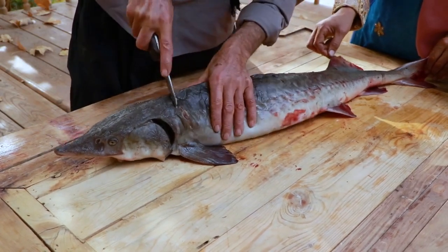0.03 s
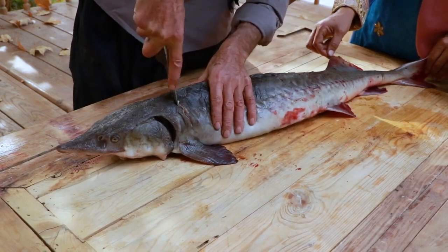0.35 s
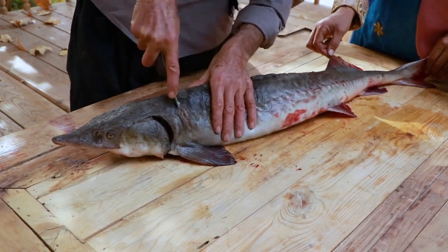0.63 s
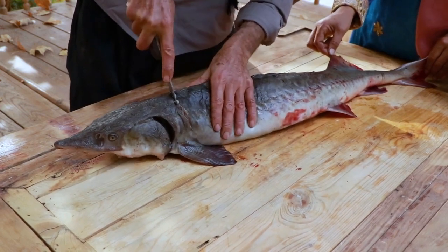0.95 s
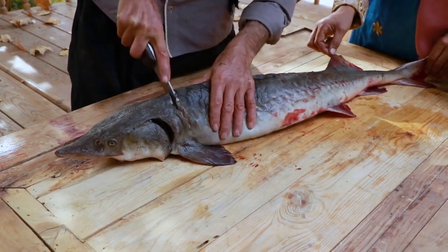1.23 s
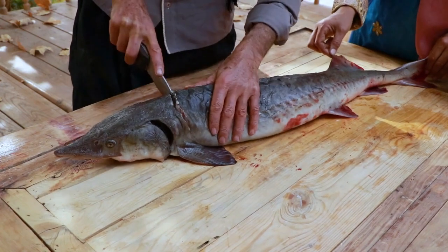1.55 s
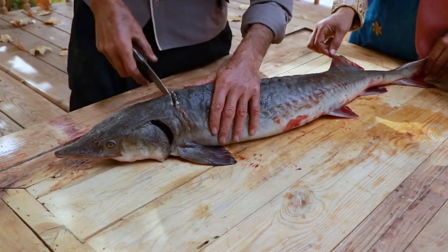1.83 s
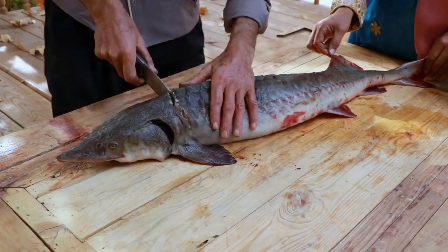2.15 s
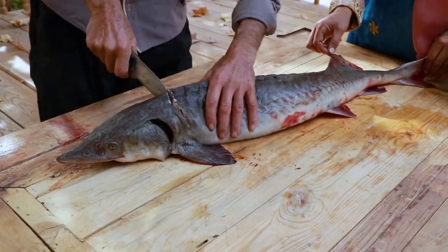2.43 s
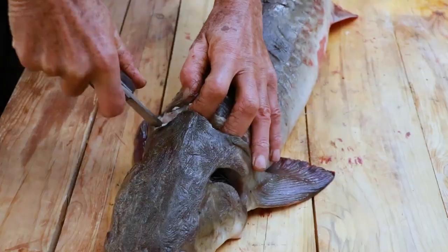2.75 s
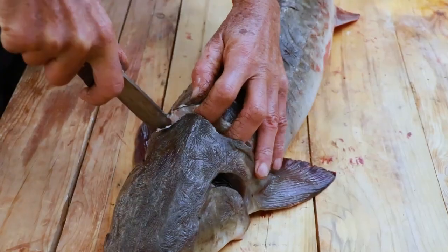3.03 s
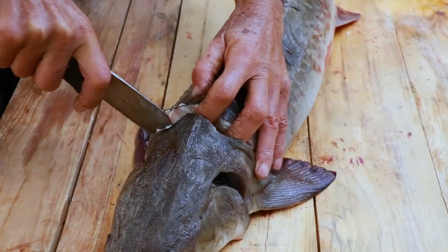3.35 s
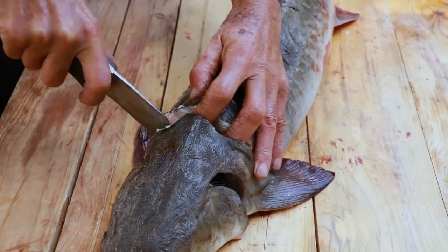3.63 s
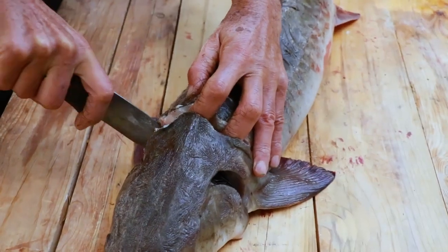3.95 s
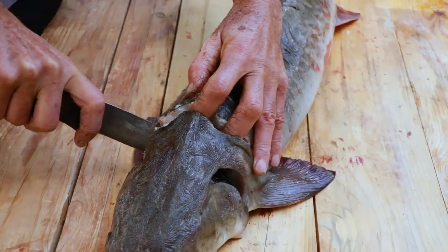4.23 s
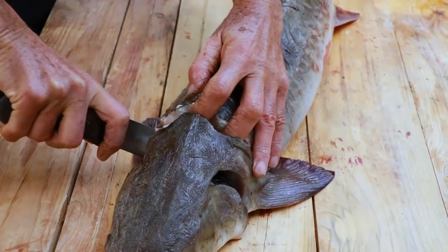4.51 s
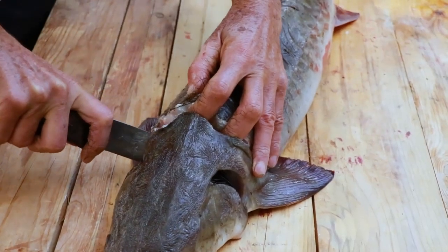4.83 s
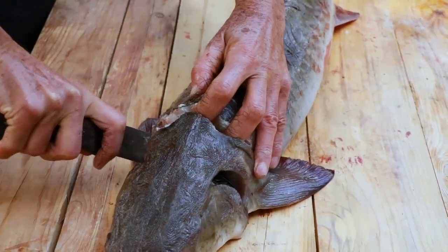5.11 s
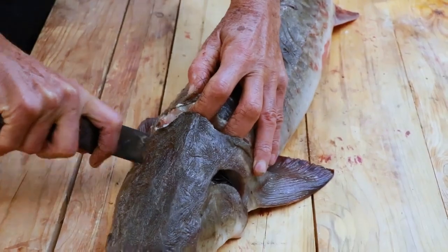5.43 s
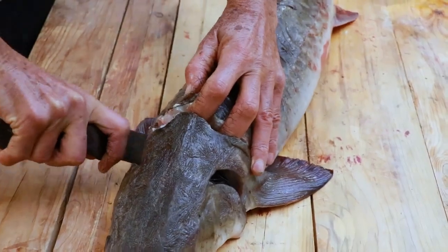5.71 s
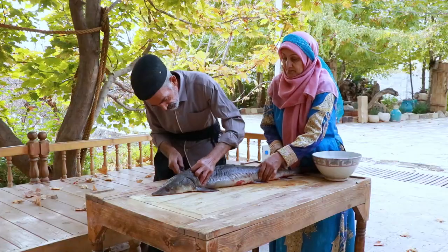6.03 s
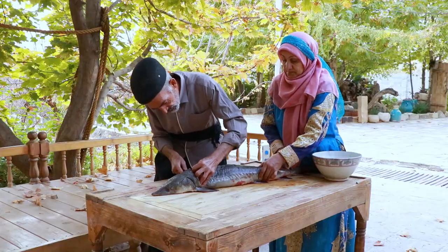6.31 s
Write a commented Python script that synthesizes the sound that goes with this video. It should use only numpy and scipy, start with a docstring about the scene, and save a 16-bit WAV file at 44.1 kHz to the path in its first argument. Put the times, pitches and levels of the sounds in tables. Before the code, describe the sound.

A knife saws into a large fish on a wooden table in an outdoor yard. Close by, the blade clicks on bony plates and rasps through wet skin in short, uneven strokes, with soft thuds on the boards and a few dull clacks. Midway the bone crunches loudest, while a small bird on the left sings chips and buzzy trills. Another bird whistles on the right, over distant twittering and a soft hush of leaves.

```python
"""A yard, where a knife saws into a large fish on a wooden table. The blade ticks on bony plates, rubs
the flesh and rasps through wet skin; the body shifts and thuds on the boards. Dull clacks echo round
the yard. A small bird to the left sings chips and buzzy trills, another whistles to the right.
Behind them are far birds, a soft hush of air and leaves and, near the end, a faint hum."""
import sys
import numpy as np
from scipy import signal
from scipy.fft import rfft, irfft, next_fast_len
from scipy.io import wavfile
from scipy.ndimage import uniform_filter1d, map_coordinates

SR = 44100
rng = np.random.default_rng(int(sys.argv[2]) if len(sys.argv) > 2 else 0)


def generate_wav(signal):
    """Clip the signal to [-1, 1] and save it as 16-bit WAV at the path in sys.argv[1]."""
    frames = np.transpose(np.atleast_2d(signal))
    scaled = np.clip(frames, -1, 1) * 32767
    pcm = np.round(scaled).astype(np.int16)
    wavfile.write(sys.argv[1], SR, pcm)


N = 289737

# The blade catches on bone. Each row: start in seconds, level in dB, knock trim in dB,
# edge trim in dB, left over right in dB.
BONE_CATCHES = [(0.594, -54, -4, 4, -4), (0.619, -20.5, -28, -11, 4), (0.661, -37, -25, -4, -1),
                (0.791, -30, -19.5, -11, 1), (1.12, -31, -26, -9.5, -1), (1.125, -35.5, -21, -11, 3),
                (1.144, -35, -21, -20, 0), (1.156, -33.5, -22, -25, 0), (1.1745, -32, -41, -25, 0),
                (1.1836, -26.5, -45, -12, 1), (1.433, -30, -16.5, -18, 4), (1.445, -36, -28, 0, -7),
                (1.468, -30.5, -29, 0, 2), (1.541, -45, -24, 0.5, -1), (1.648, -51, -25, 4, -4),
                (2.445, -46.5, -46, 2, 0), (2.641, -45.5, 0, -23, -13), (2.680, -25, -7, -4.5, -3),
                (2.696, -12, -15, -11.5, -1), (2.705, -28, -8, -16, 2), (2.714, -20.5, -9.5, -12, 1),
                (2.7234, -19, -16.5, -7, -1.5), (2.741, -35.5, -0.5, -22, -1),
                (2.767, -39.5, -4.5, -25, -3), (2.8068, -33.5, -14.5, -5, 2), (2.816, -44, -11, -2, -2),
                (2.838, -40, -9, -30, -9), (2.869, -36.5, -12, -28, -3), (2.881, -39, -20, -31, 3),
                (2.917, -48, -1, -30, 1), (2.948, -35, -11, -32, 2), (3.0114, -47, -39, -14, 5),
                (3.753, -38, -16, -27, 2), (3.7929, -19, -45, -20, 0), (3.821, -36, -10, -30, 1),
                (4.62, -31.5, -8.5, -16, 7), (4.763, -44.5, -18, -17, 3), (5.011, -38, -30, -16, 1),
                (5.7005, -33.5, -2, -21, 0), (5.7501, -32.5, -8, -7.5, -2), (5.755, -39, -18, -12, 0),
                (6.0568, -38, -12, -32, 4), (6.149, -41, -10, -11, 0), (6.4274, -44, -18, -5, 3)]
# Tone of the cracking bone and of the bright knife edge. Each row: frequency in Hz, level in dB.
BONE_EQ = [(300, -7), (1500, -12.5), (2500, 3.5), (4000, 4), (6000, 7.5), (8000, -10), (12000, -23)]
EDGE_EQ = [(5000, -38), (8000, -2.5), (11500, 8.5), (14000, -3), (16000, -15)]
# Resonances of the fish's head. Each row: frequency in Hz, bandwidth in Hz, level in dB.
SKULL_MODES = [(1020, 62, 29), (2240, 250, -28)]

def bone_ticks(snap_s=0.00084, crumble_s=0.0092, crumble_db=-15):
    """The edge snaps over a bony plate: a crack, a short crumble and a knock in the head."""
    out, t = np.zeros((2, N)), np.arange(SR // 12) / SR
    envelope = np.exp(-t / snap_s) + amp(crumble_db) * np.exp(-t / crumble_s)
    for start, db, knock_db, edge_db, left_db in BONE_CATCHES:
        crack = amp(-12) * crest(coloured(stereo_noise(len(t), 0.4) * envelope, BONE_EQ))
        edge = amp(edge_db - 11) * crest(coloured(stereo_noise(len(t), 0.13) * envelope, EDGE_EQ))
        ring = sum(amp(level) * np.exp(-np.pi * width * t)
                   * np.sin(2 * np.pi * hz * rng.normal(1, 0.099) * t)
                   for hz, width, level in SKULL_MODES)
        knock = amp(knock_db - 4) * crest((ring * np.exp(-t / 0.007))[None])
        add(out, start, amp(db) * pan(left_db) * (crack + pan(-4) * edge + knock))
    return out


# Strokes of the knife. Each row: start in seconds, length in seconds, then levels in dB for
# pressure on the table, rub, wet rasp and blade hiss.
KNIFE_STROKES = [(0.002, 0.095, -53, -73, -71, -83), (0.111, 0.024, -49, -54.5, -67, -78),
                 (0.386, 0.31, -50, -66, -64.5, -69), (0.658, 0.038, -62, -66, -53, -66),
                 (0.791, 0.01, -49, -63, -51, -62), (1.074, 0.087, -48, -72, -54, -62),
                 (1.397, 0.068, -47, -52, -60.5, -62), (2.418, 0.074, -55, -56.5, -64, -66),
                 (2.533, 0.043, -67, -78, -76, -78), (2.609, 0.072, -49, -46, -62, -76),
                 (2.675, 0.11, -36.5, -45, -63, -72), (2.792, 0.028, -50, -53, -52, -61),
                 (2.853, 0.1, -49, -52.5, -82, -85), (3.466, 0.056, -65, -52, -54.5, -76),
                 (3.738, 0.055, -46, -41.5, -49.5, -62), (4.016, 0.062, -48, -52.5, -78, -85),
                 (4.491, 0.16, -45, -49, -60.5, -76), (4.982, 0.086, -46, -47, -60.5, -77),
                 (5.311, 0.068, -59, -48.5, -65, -67), (5.611, 0.055, -41.5, -45, -63, -82),
                 (5.672, 0.02, -36.5, -35.5, -55, -78), (5.741, 0.01, -52, -49.5, -59, -78),
                 (6.149, 0.098, -74, -54, -60, -60), (6.262, 0.77, -66, -69, -61, -75)]

def stroke_envelopes(bite_s=0.0097, build_db=6.5, release_s=0.019, linger_db=-12.5, linger_s=0.11):
    """Each stroke bites, builds as the blade digs in and lets go; the wet skin crackles on softly."""
    power, t = np.zeros((4, N)), np.arange(SR) / SR
    for start, length, *levels_db in KNIFE_STROKES:
        build = np.minimum(t / bite_s, 1) * amp(build_db * (np.minimum(t / length, 1) - 1))
        after = np.maximum(t - length, 0)
        release = np.hypot(np.exp(-after / release_s), amp(linger_db) * np.exp(-after / linger_s))
        add(power, start, (amp(levels_db)[:, None] * build * release) ** 2)
    return np.sqrt(power)


# Tone of the boards, rubbed flesh, wet rasp and sliding blade. Each row: frequency in Hz, level in dB.
BOARDS_EQ = [(18, -73), (30, -18.5), (102, -1), (234, -8.5), (264, -11), (317, -6), (436, -17), (510, -23),
             (552, -18), (700, -24.5), (910, -77), (1540, -120)]
FLESH_EQ = [(250, -35), (450, -3), (950, 4), (1500, -0.5), (2200, -4), (4000, -8), (7000, -31)]
RASP_EQ = [(1000, -11), (2500, -2), (5500, 8), (8000, -9), (11500, -4.5), (14000, -14), (16000, -38)]
SLIDE_EQ = [(5000, -25), (8000, -10), (10500, 3), (13000, -8), (15500, -4)]

def sawing(judder_db=2):
    """The knife rocks the table, rubs the flesh, tears wet skin in tiny grains and hisses as it slides."""
    press, drag, tear, slide = stroke_envelopes() * amp(judder_db * wobble(45))
    boards = amp(-6.5) * unit(rush(BOARDS_EQ, grain_db=-0.5, patchy_db=3.5).mean(0))
    rub = amp(-6) * rush(FLESH_EQ, grain_db=3.5, patchy_db=4.5)
    rub += amp(-19.5) * scale_snaps(per_s=500, spread_db=9)
    rasp = amp(1.5) * rush(RASP_EQ, grain_db=1.5, patchy_db=3.5)
    rasp += amp(-8) * scale_snaps(per_s=70, spread_db=4)
    hiss = amp(-1.5) * rush(SLIDE_EQ, grain_db=2.5, patchy_db=3)
    return press * boards + drag * rub + tear * rasp * pan(-0.49) + slide * hiss


def scale_snaps(per_s, spread_db):
    """Tiny scales snap under the edge at random."""
    snaps = (rng.random(N) < per_s / SR) * amp(spread_db * np.clip(rng.standard_normal(N), -2, 2))
    return unit(coloured(snaps * stereo_noise(N, 0.43), BONE_EQ))


# Wet pockets pop. Each row: start in seconds, level in dB, pitch in Hz.
WET_POCKETS = [(0.7909, -40.5, 2130), (2.741, -33.5, 2180), (2.746, -49, 2370)]

def wet_pops(life_s=0.00096):
    """Small cavities in the flesh open and ring for a few cycles."""
    out, t = np.zeros(N), np.arange(SR // 40) / SR
    envelope = t / life_s * np.exp(1 - t / life_s)
    for start, db, hz in WET_POCKETS:
        add(out, start, amp(db) * envelope * np.sin(2 * np.pi * hz * t))
    return out


# The fish bumps the boards. Each row: start in seconds, level in dB, pitch in Hz, shudder trim in dB.
BODY_BUMPS = [(0.151, -42.5, 363, -5), (0.207, -49, 145, -6), (0.382, -41.5, 90, -5.5),
              (0.481, -45, 107, -20), (0.542, -39, 102, -4.5), (0.573, -43.5, 106, 5),
              (1.088, -38.5, 149, -5), (1.15, -41, 100, -21), (1.18, -41, 124, -7), (1.377, -41, 95, -5),
              (1.391, -37, 316, -4), (2.149, -39, 116, -9.5), (2.464, -28, 317, -27),
              (2.616, -30.5, 415, -12), (2.685, -30, 287, -7), (2.698, -27, 300, -17),
              (2.919, -41, 344, -5.5), (3.761, -41, 86, -6), (3.921, -36.5, 124, -6),
              (4.015, -29.5, 200, -4.5), (4.025, -28, 380, -10), (4.048, -37, 200, -17),
              (4.061, -55, 190, -18), (4.546, -44.5, 126, -18), (5.614, -41.5, 115, -8),
              (5.821, -33.5, 125, -10), (5.833, -30.5, 235, -24), (5.845, -38.5, 284, -22)]

def body_thuds(rise_cycles=0.95, shudder_t60_s=0.26, low_cut_hz=45):
    """The body gives a soft push of a few cycles, and the boards shudder."""
    out, t = np.zeros((2, N)), np.arange(SR // 3) / SR
    for start, db, hz, shudder_db in BODY_BUMPS:
        age = t * hz / rise_cycles
        push = age * np.exp(1 - age) * np.sin(2 * np.pi * hz * t)
        shudder = crest(coloured(stereo_noise(len(t), 0.97) * amp(-60 * t / shudder_t60_s), BOARDS_EQ))
        add(out, start, amp(db) * (amp(-4.5) * push + amp(shudder_db - 3) * shudder))
    return signal.sosfilt(signal.butter(2, low_cut_hz, "highpass", fs=SR, output="sos"), out)


# Clacks in the yard. Each row: start in seconds, level in dB, left over right in dB, snap trim in dB.
CLACK_HITS = [(0.282, -36, -2, -8), (0.672, -37, 0.5, -3), (1.751, -38.5, 0, -4), (2.24, -39, -0.5, -8),
              (4.021, -53.5, 15, -30), (4.607, -33, -1.5, -0.5), (4.974, -39.5, 0.5, -16),
              (5.049, -45, 3, -16)]
# Their woody tone. Each row: frequency in Hz, level in dB.
CLACK_EQ = [(210, -53), (350, -35), (537, 1), (824, 0.5), (1280, -0.5), (2000, -3), (2310, -5.5),
            (2750, -5.5), (2980, -7), (3280, -4), (5530, -7.5), (8220, -23.5), (11500, -19.5), (15500, -30)]

def wooden_clacks(rise_s=0.00021, decay_s=0.016, snap_s=0.0084):
    """Dull wooden clacks: a fast-dying burst of noise with a brief snap on top."""
    out, t = np.zeros((2, N)), np.arange(SR // 6) / SR
    envelope = (1 - np.exp(-t / rise_s)) * np.exp(-t / decay_s)
    for start, db, left_db, snap_db in CLACK_HITS:
        body = crest(coloured(stereo_noise(len(t), 0.33) * envelope, CLACK_EQ))
        snap = crest(coloured(stereo_noise(len(t), 0.26) * np.exp(-t / snap_s), RASP_EQ))
        add(out, start, amp(db - 2.5) * pan(left_db) * (body + amp(snap_db) * snap))
    return out


# The near bird's chips; those sung facing away arrive mostly as echo. Each row: start and length in
# seconds, first, middle and last pitch in Hz, level in dB, direct-path trim in dB.
NEAR_CHIPS = [(1.951, 0.018, 3730, 3470, 3340, -39, 1.5), (2.003, 0.0122, 6220, 6150, 5600, -33.5, 3.5),
              (2.237, 0.0195, 3620, 3560, 3270, -35, 5.5), (2.29, 0.0134, 6200, 5990, 5300, -29, 0.5),
              (2.449, 0.0304, 6450, 6680, 7060, -28, -1), (3.247, 0.011, 4770, 4770, 4870, -36, 4.5),
              (3.252, 0.033, 2770, 3070, 3200, -52, 6), (3.279, 0.018, 3350, 3405, 3560, -30, 4.5),
              (3.55, 0.026, 7040, 7320, 7270, -37.5, -9), (3.586, 0.017, 6960, 6320, 5100, -34.5, -4),
              (3.955, 0.0127, 5630, 6340, 6670, -42, -5), (3.978, 0.06, 4740, 4660, 4610, -40, -5),
              (4.024, 0.0278, 2430, 2675, 2900, -34.5, -3.5), (4.08, 0.0182, 5460, 6380, 6770, -47, -3),
              (4.103, 0.0448, 4470, 4656, 4670, -41, -3.5), (4.148, 0.0175, 2413, 2563, 2780, -35, 0)]
# Its trills. Each row: start, attack and length in seconds, first and last pitch in Hz, level and fade
# in dB, beats per second, sweep in Hz, pulsing in dB, opening hoarseness in Hz, rasp in Hz.
NEAR_TRILLS = [(2.518, 0.025, 0.65, 5280, 5516, -33, -0.6, 114.5, 266, 7.5, 145.3, 83.7),
               (3.277, 0.013, 0.2, 3488, 3944, -27.5, 9.5, 280, 337, -3, 25, 69),
               (3.6396, 0.046, 0.255, 3330, 3685, -27, 10, 71.5, 225, 6.5, 35.4, 61)]
# Tone of its two low trills, and of its whole song on the right. Each row: frequency in Hz, level in dB.
THROAT_EQ = [(2400, -17), (2850, -2), (3150, -4), (3450, 6), (3800, 1), (4100, 4.5), (4400, 4), (4750, -15)]
RIGHT_SIDE_EQ = [(3600, -2.5), (5300, 3), (6500, 3.5)]

def near_bird(lag_radians=2.53):
    """A small bird sings hard left; its song reaches the right side weak and out of phase."""
    high, rising, slow = [trill(*row) for row in NEAR_TRILLS]
    low = coloured((rising + slow)[None], THROAT_EQ)[0]
    # A faint second tone runs under the high trill; their sum frequency is a sheen far above it.
    high_envelope = np.sqrt(np.abs(uniform_filter1d(high ** 2, size=400)))
    undertone = high_envelope * tone(4000 + 60 * wobble(200))
    sheen = filtered(high * unit(undertone), lambda hz: hz > 7000)
    buzz = high + low + amp(-27.5) * undertone + amp(-39.5) * sheen
    song = buzz + chirps([row[:-1] for row in NEAR_CHIPS])
    aimed = buzz + chirps([(*note, db + direct_db) for *note, db, direct_db in NEAR_CHIPS])
    lagged = filtered(aimed, lambda hz: np.exp(-1j * lag_radians))
    direct = amp(-2.3) * np.array([aimed, amp(-16.5) * lagged])
    left, right = direct + amp([[-12], [-19]]) * scatter(song) + amp([[-9], [-17.5]]) * yard_reverb(song)
    return np.array([left, filtered(right, lambda hz: amp(along(RIGHT_SIDE_EQ, hz)))])


def trill(start, attack_s, length, first_hz, last_hz, db, fade_db, rate_hz, sweep_hz, pulse_db,
          hoarse_hz, rasp_hz, release_s=0.0061, hoarsest_s=0.0587, scoop_s=0.0171, scoop_hz=150):
    """A buzz that opens hoarse and low, then climbs, its pitch swinging fast and unevenly."""
    t = np.arange(N) / SR - start
    progress = np.clip(t / length, 0, 1)
    gate = np.clip(t / attack_s, 0, 1) * np.clip(1 - (t - length) / release_s, 0, 1)
    looseness = 0.11 * np.clip(t / 0.2, 0, 1) ** 2  # the beat starts steady, then loosens
    beat = 2 * np.pi * np.cumsum((t > 0) * rate_hz * (1 + looseness * wobble(120))) / SR
    swing = np.cos(beat) + 0.12 * np.cos(2 * beat)  # dwells low, flicks upward
    opening = np.exp(-2 * (t / hoarsest_s - 1) ** 2)
    rasp = rasp_hz * wobble(700) + hoarse_hz * opening * (wobble(1400) - 1.1)
    climb = first_hz + (last_hz - first_hz) * progress ** 0.6
    scoop = np.exp(-np.maximum(t, 0) / scoop_s)
    pitch = climb - scoop_hz * scoop + sweep_hz * (1 - scoop) * swing + rasp
    depth_db = pulse_db * (0.5 - 0.35 * progress)  # positive accents the downward sweeps
    pulses = unit(amp(depth_db * np.sin(beat) + 2.2 * wobble(160)))
    return gate * amp(db - fade_db * progress) * pulses * tone(pitch)


def chirps(notes, swell=0.37, quiver_s=0.0022, waver_hz=12):
    """Short notes glide through three pitches; the faster the glide, the more the pitch quivers."""
    out, waver = np.zeros(N + SR), wobble(450)
    for start, length, first_hz, middle_hz, last_hz, db in notes:
        progress = np.linspace(0, 1, int(length * SR))
        glide = np.polyval(np.polyfit([0, .5, 1], [first_hz, middle_hz, last_hz], 2), progress)
        depth_hz = waver_hz + quiver_s * abs(last_hz - first_hz) / length
        quiver = depth_hz * np.roll(waver, -int(start * SR))[:len(progress)]
        envelope = np.abs(np.sin(np.pi * progress)) ** swell
        add(out, start, amp(db + 2) * envelope * tone(glide + quiver))
    return out[:N]


# The second bird's whistles. Each row: start in seconds, level in dB.
WHISTLE_CUES = [(0.633, -2), (5.242, -2)]
# The shape of one whistle. Each row: time into it in seconds, pitch in Hz, level in dB.
WHISTLE_SHAPE = [(0, 3980, -62), (.009, 4680, -54), (.024, 5090, -55), (.046, 5260, -40), (.066, 5120, -51),
                 (.085, 4900, -42.5), (.12, 4730, -50), (.155, 4692, -49), (.186, 4760, -55),
                 (.206, 5200, -50), (.222, 6070, -50), (.235, 6510, -43.5), (.255, 6716, -50.5),
                 (.3, 6750, -59.5)]

def whistling_bird(waver_hz=9):
    """A bird to the right repeats one slurred whistle, blurred by the foliage."""
    hz, db = curves(WHISTLE_SHAPE)
    song, size = np.zeros(N), int(WHISTLE_SHAPE[-1][0] * SR)
    for start, level in WHISTLE_CUES:
        whistle = amp(db + level + 8) * tone(hz + waver_hz * wobble(252))
        add(song, start, whistle[:size])
    foliage = amp([[-19], [-12]]) * scatter(song, decay_s=0.02)
    return amp([[-19], [-4.5]]) * song + foliage + amp([[-14.5], [-3.5]]) * yard_reverb(song)


# Distant calls. Each row: start and length in seconds, first, middle and last pitch in Hz,
# level in dB, direct-path trim in dB.
DISTANT_CALLS = [(.9, 0.025, 4300, 3850, 3430, -64, 2), (.95, 0.1, 7170, 7070, 6980, -64.5, -10),
                 (1.045, 0.037, 4190, 3850, 3400, -71, 3), (4.631, 0.028, 2610, 2550, 2580, -61.5, 9),
                 (5.072, 0.016, 3780, 3750, 3720, -64, 7.5), (5.08, 0.093, 945, 938, 955, -68, 5.5),
                 (5.08, 0.086, 1966, 1856, 1860, -68, 0), (5.18, 0.029, 1860, 1816, 1770, -63, 4.5),
                 (5.385, 0.22, 3150, 3535, 3380, -65, -2), (5.605, 0.12, 3016, 3006, 3020, -63, 4.5),
                 (5.83, 0.17, 3970, 3200, 2960, -65.5, 1), (6.42, 0.19, 4650, 4975, 4890, -63, -4),
                 (6.44, 0.068, 7020, 7000, 6770, -69, -6)]

def far_birds():
    """Single wavering calls from far off, washed in echo."""
    song = chirps([row[:-1] for row in DISTANT_CALLS], waver_hz=38)
    direct = chirps([(*note, db + direct_db) for *note, db, direct_db in DISTANT_CALLS], waver_hz=20)
    return amp(1.5) * direct + amp(4.5) * yard_reverb(song)


def bird_chorus(count=260):
    """Many far birds twitter in falling notes at random, blurred together by their echoes."""
    when, duration, pitch, glide, level = rng.random((count, 5)).T
    start, length = when * N / SR, 0.016 + 0.0346 * duration
    hz = 2400 + 2000 * pitch ** 1.5
    notes = np.transpose([start, length, hz * 1.1, hz, hz * (0.862 + 0.13 * glide), -74 + 3 * level])
    return yard_reverb(chirps(notes))


# The ride of the background bed. Each row: time in seconds, air level in dB, leaf level in dB.
HUSH_LEVELS = [(0.0, -59, -62.5), (0.71, -58, -65), (2.53, -60.5, -64), (2.82, -57, -66), (3.29, -61, -64),
               (4.06, -58, -62.5), (4.9, -59, -62), (6.57, -52.5, -62)]
# Tone of the air and of the leaves. Each row: frequency in Hz, level in dB.
AIR_EQ = [(15, -52), (25, -18), (82, -2), (129, -6.5), (206, -7.5), (244, -7.5), (295, -8.5), (493, -10),
          (595, -12.5), (671, -13), (1500, -19), (1950, -25), (3300, -120)]
LEAVES_EQ = [(710, -74), (1200, -9.5), (1350, -10), (2590, 0), (3140, -1.5), (4020, -4.5), (5910, -7.5),
             (7170, -16.5), (9270, -23), (9990, -17), (11000, -20), (13500, -23), (15500, -35)]

def outdoor_hush():
    """Low outdoor air and a soft hiss of leaves."""
    air_db, leaves_db = curves(HUSH_LEVELS)
    air = amp(air_db + 0.4 + 0.6 * wobble(6.3)) * rush(AIR_EQ, grain_db=0.4, patchy_db=3)
    leaves = amp(leaves_db + 3.5 + 0.1 * wobble(1.12)) * rush(LEAVES_EQ, grain_db=0.6, patchy_db=3.5)
    return air + leaves


# The tones of a faint hum. Each row: pitch in Hz, level in dB.
HUM_TONES = [(87, -57.5), (240, -62), (510, -62.5)]

def faint_hum(start_s=5.87, fade_in_s=0.03, waver_hz=7, flutter_db=3):
    """A few unsteady low tones come in near the end."""
    tones = sum(amp(db) * unit(amp(flutter_db * wobble(18))) * tone(hz + waver_hz * wobble(40))
                for hz, db in HUM_TONES)
    return tones * np.clip((np.arange(N) / SR - start_s) / fade_in_s, 0, 1)


def scatter(song, decay_s=0.023, patterns=4, head_turns_per_s=14):
    """Branches, deck and table top scatter a song; the early echoes shift as the bird turns its head."""
    t = np.arange(SR // 14) / SR
    impulses = rng.standard_normal((patterns, 2, len(t))) * np.exp(-t / decay_s)
    impulses /= np.linalg.norm(impulses[0, 0])
    echoes = signal.fftconvolve(song[None, None], impulses, axes=2)[..., :N]
    shares = np.array([wobble(head_turns_per_s) for _ in range(patterns)])
    shares /= np.linalg.norm(shares, axis=0)
    return (echoes * shares[:, None]).sum(0)


# The yard's tail. Each row: frequency in Hz, time to fall 60 dB in seconds.
YARD_DECAY = [(200, 0.28), (2000, 0.48), (5000, 0.5), (10000, 0.32)]

def yard_reverb(x, build_s=0.0021):
    """Walls and trees answer with a diffuse tail, different at each ear."""
    hz, t, noise = signal.stft(rng.standard_normal((2, SR // 2)), SR, nperseg=256)
    envelope = amp(-60 * t / along(YARD_DECAY, hz)[:, None]) * (1 - np.exp(-t / build_s))
    tail = signal.istft(noise * envelope, SR, nperseg=256)[1]
    return signal.fftconvolve(np.atleast_2d(x), tail / np.linalg.norm(tail[0]), axes=1)[:, :N]


# Stereo image of the noise layers. Each row: frequency in Hz, left-right likeness from 0 to 1.
STEREO_LIKENESS = [(60, 0.81), (150, 0.54), (380, 0.4), (950, 0.29), (2380, 0.46), (5980, 0.088),
                   (15000, 0.03)]

def rush(eq, grain_db, patchy_db):
    """Stereo noise of rms 1, clumped into tiny grains and brief ringing patches, near mono in the bass."""
    def mid_side_gains(hz):
        width = np.arccos(np.clip(along(STEREO_LIKENESS, hz), -1, 1)) / 2
        return amp(along(eq, hz)) * [np.cos(width), np.sin(width)]

    bins = signal.stft(rng.standard_normal((2, N)), nperseg=1024)[2]
    patches = uniform_filter1d(rng.standard_normal(bins.shape[1:]), size=2, axis=0)
    patches = unit(uniform_filter1d(patches, size=5, axis=1))
    noise = signal.istft(bins * amp(patchy_db * patches), nperseg=1024)[1][:, :N]
    grains = noise * amp(grain_db * (wobble(700) + wobble(70)))
    mid, side = filtered(grains, mid_side_gains)
    return unit(np.array([mid + side, mid - side]))


def stereo_noise(size, likeness):
    """Two white noises that share a part of their power."""
    shared = np.sqrt(likeness) * rng.standard_normal(size)
    return shared + np.sqrt(1 - likeness) * rng.standard_normal((2, size))


def tone(hz):
    """A sine that follows a pitch curve."""
    return np.sin(2 * np.pi * np.cumsum(hz) / SR)


def wobble(rate):
    """A smooth random curve, rate knots a second."""
    return map_coordinates(rng.standard_normal(int(N * rate / SR) + 4), [np.arange(N) * rate / SR])


def coloured(x, eq, size=1024):
    """Minimum-phase EQ through (Hz, dB) points: nothing rings ahead of an attack."""
    cepstrum = irfft(np.log(amp(along(eq, np.fft.rfftfreq(size, 1 / SR))) + 1e-6))
    cepstrum[1:size // 2] *= 2
    cepstrum[size // 2 + 1:] = 0
    impulse = irfft(np.exp(rfft(cepstrum)))
    return signal.fftconvolve(x, impulse[None], axes=1)[:, :x.shape[1]]


def filtered(x, response):
    """Apply a complex gain given as a function of frequency."""
    size = next_fast_len(x.shape[-1] + 8192)
    return irfft(rfft(x, size) * response(np.fft.rfftfreq(size, 1 / SR)), size)[..., :x.shape[-1]]


def along(points, hz):
    """Read (Hz, value) points on a log axis."""
    knots_hz, values = np.transpose(points)
    return np.interp(np.log(hz + 1), np.log(knots_hz + 1), values)


def curves(rows):
    """One value per sample for each column after the time."""
    times, *columns = np.transpose(rows)
    return [np.interp(np.arange(N) / SR, times, column) for column in columns]


def amp(db):
    """Decibels to gain."""
    return 10 ** (np.asarray(db) / 20)


def pan(left_db):
    """Left and right gains; positive leans left."""
    return amp([[left_db / 2], [-left_db / 2]])


def unit(x):
    """Scale to rms 1."""
    return x / np.sqrt(np.mean(x ** 2) + 1e-20)


def crest(x):
    """Scale so that the loudest two milliseconds have rms 1."""
    return x / np.sqrt(uniform_filter1d(np.mean(x ** 2, 0), 88, mode="constant").max() + 1e-20)


def add(track, start_s, sound):
    """Mix a sound in at its start time."""
    part = track[..., max(round(start_s * SR), 0):][..., :sound.shape[-1]]
    part += sound[..., :part.shape[-1]]


def scene():
    """The work at the table and its echo, the birds and the background bed."""
    work = bone_ticks() + wet_pops() + wooden_clacks() + body_thuds() + sawing()
    echo = amp(-15.5) * yard_reverb(work)
    birds = near_bird() + whistling_bird() + far_birds() + bird_chorus()
    return work + echo + birds + outdoor_hush() + faint_hum()


def record(dry, high_cut_hz=15900):
    """Master EQ: the top octave leans right, and the very top is cut away."""
    tilt_db = lambda hz: along([(6500, 0), (9500, 1.5)], hz)
    return filtered(dry, lambda hz: amp([-tilt_db(hz), tilt_db(hz) / 2]) * (hz < high_cut_hz))


dry = scene()
out = record(dry)
generate_wav(out)
```